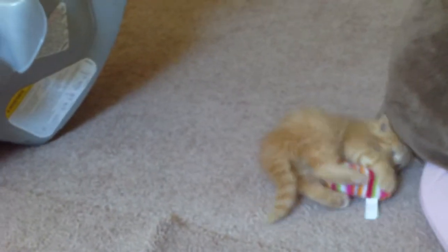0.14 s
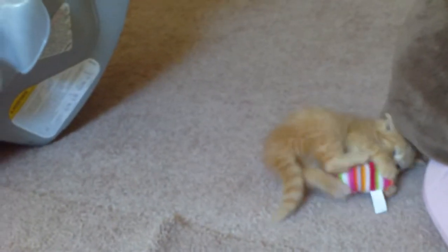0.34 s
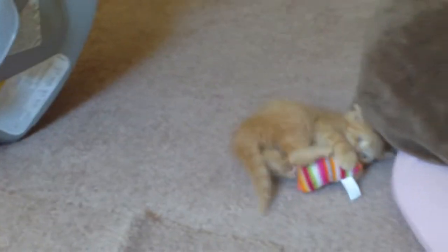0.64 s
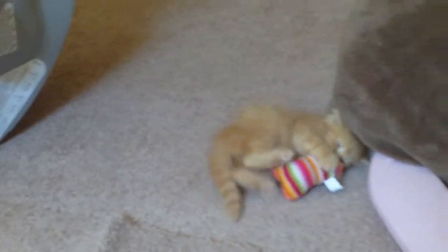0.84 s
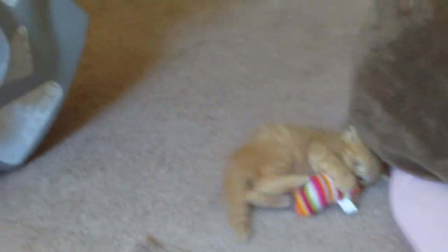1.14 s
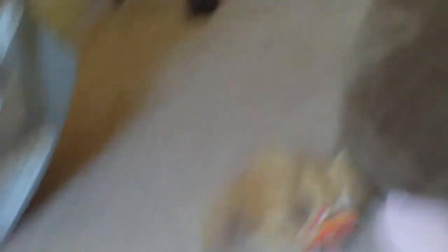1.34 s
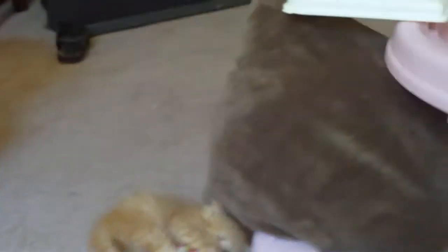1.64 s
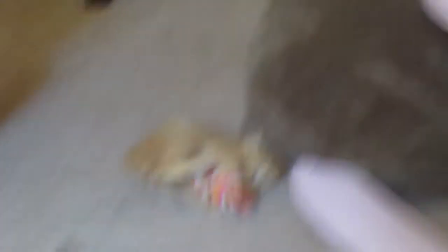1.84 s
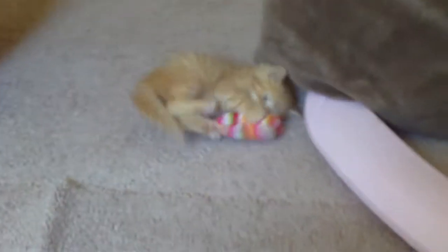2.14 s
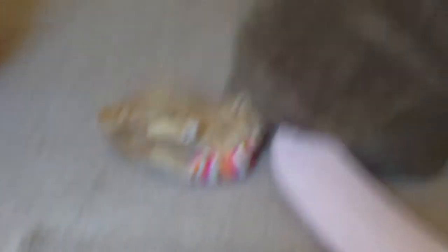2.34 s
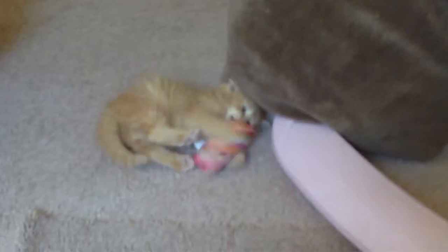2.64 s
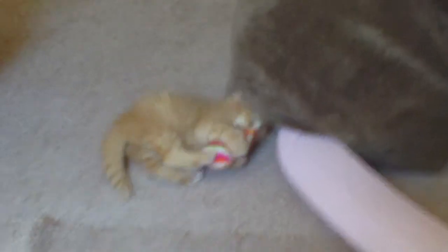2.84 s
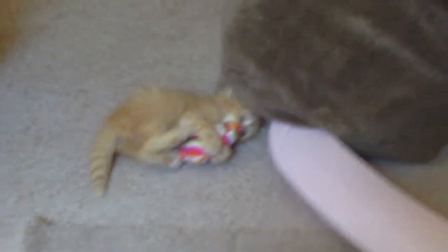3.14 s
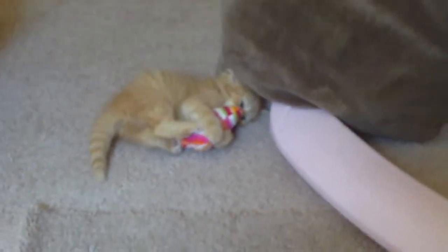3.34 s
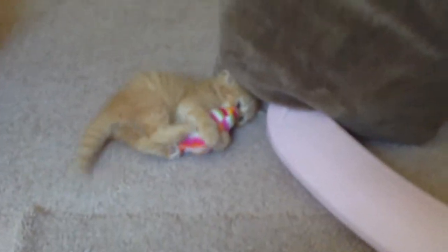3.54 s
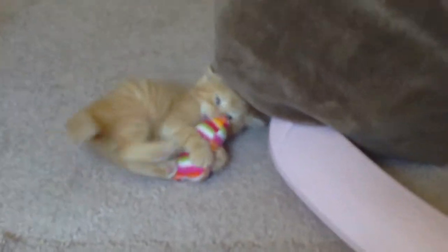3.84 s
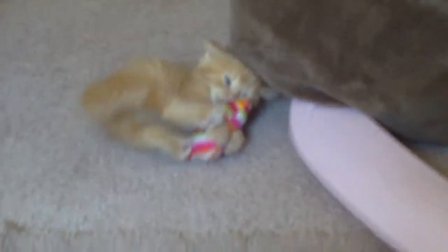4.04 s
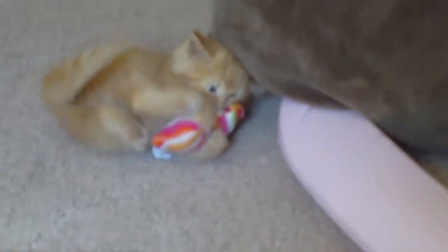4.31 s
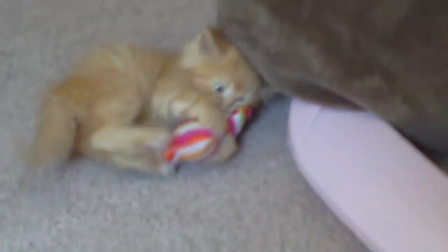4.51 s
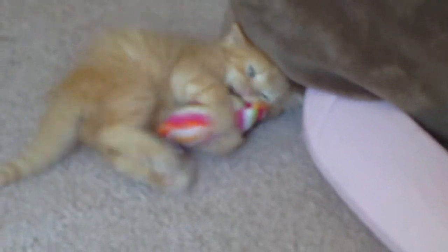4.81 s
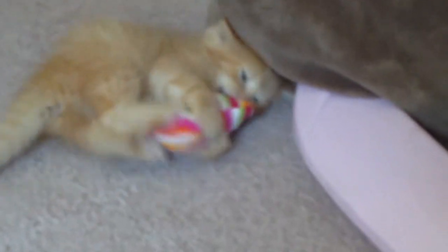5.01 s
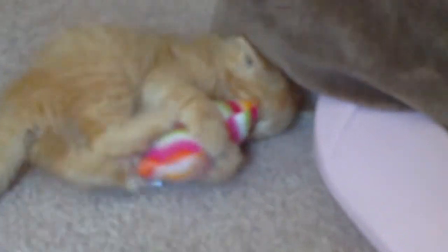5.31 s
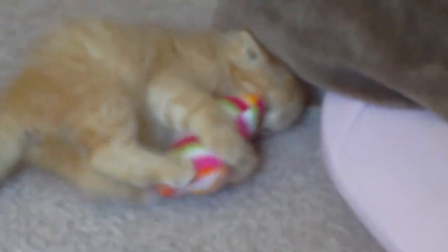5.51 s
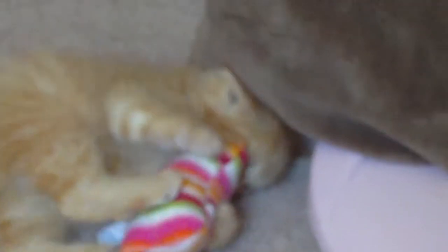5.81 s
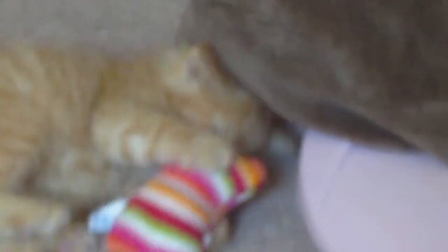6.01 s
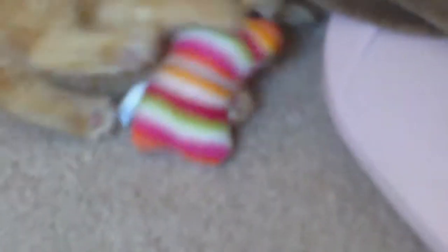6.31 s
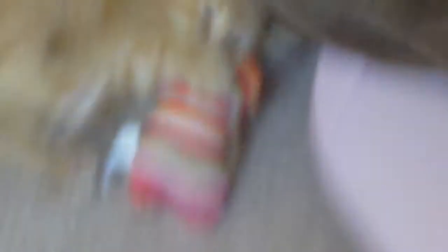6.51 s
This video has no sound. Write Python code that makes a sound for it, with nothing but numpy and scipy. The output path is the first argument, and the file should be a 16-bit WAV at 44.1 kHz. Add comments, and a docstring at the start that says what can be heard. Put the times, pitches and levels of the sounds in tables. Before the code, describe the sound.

A kitten wrestles a stuffed fabric toy on carpet, heard from close by in a quiet, dry room. Soft hiss and a faint, thin camera whine run throughout. Around 0.4 seconds a few small hard parts click lightly. From 1.2 seconds cloth rubs in short, swelling, scratchy strokes, with claws snagging in the weave and soft bumps. The loudest knock lands at 1.5 seconds, and a quick cluster of clacks and bumps follows at 1.8. One more rub swells at about 2.2 seconds, then fades to faint brushing with light ticks and is gone by 3.1. Scattered plastic-like clicks follow with gaps between them, the sharpest at 3.3 and 4.5 seconds and a double one near 5.7. After a last small tick at 5.8 seconds, only the hiss and whine remain until the end at about 6.7 seconds.

```python
"""A kitten wrestles a stuffed fabric toy on carpet, heard from close by over room air and camera whine.
First small hard parts click faintly. From 1.2 s cloth rubs in swelling stick-slip strokes, claws snag
in the weave, and the parts bump and ring on impact, hardest at 1.5 s. The rubbing dies away by 3.1 s.
Scattered clicks follow, the sharpest at 3.3, 4.5 and 5.7 s; gain control ducks after the hardest ones.
At the end only the hiss and the thin whine remain."""
import sys
import numpy as np
from scipy import signal
from scipy.fft import rfft, irfft
from scipy.io import wavfile
from scipy.ndimage import uniform_filter1d, map_coordinates

SR = 44100
rng = np.random.default_rng(int(sys.argv[2]) if len(sys.argv) > 2 else 0)


def generate_wav(signal):
    """Clip the signal to [-1, 1] and save it as 16-bit WAV at the path in sys.argv[1]."""
    frames = np.transpose(np.atleast_2d(signal))
    scaled = np.clip(frames, -1, 1) * 32767
    pcm = np.round(scaled).astype(np.int16)
    wavfile.write(sys.argv[1], SR, pcm)


N = 293882
TIME = np.arange(N) / SR
BAND_EDGE_HZ, HISS_EDGE_HZ = 16300, 15400
IMPACT_RISE_S = .0005


def amp(db):
    """Amplitude ratio: tenfold for every 20 dB."""
    return 10 ** (np.asarray(db) / 20)


def unit_rms(x):
    """Power normalisation to rms 1."""
    return x / np.sqrt(np.mean(x ** 2) + 1e-20)


def unit_energy(x):
    """Energy normalisation of a transient to that of 5 ms at rms 1."""
    return x / np.sqrt(np.sum(x ** 2) / (.005 * SR) + 1e-20)


def colour(x, spectrum, peaks=()):
    """Minimum-phase filtering: a broad spectrum with resonance peaks on top."""
    hz = np.fft.rfftfreq(4096, 1 / SR)
    points_hz, points_db = np.transpose(spectrum)
    db = np.interp(np.log(hz + 1), np.log(points_hz + 1), points_db)
    db += sum(rise / (1 + (2 * (hz - centre) / width) ** 2) for centre, width, rise in peaks)
    log_gain = np.log(amp(np.r_[db, db[-2:0:-1]]))
    taps = np.fft.ifft(np.exp(np.conj(signal.hilbert(log_gain)))).real
    return signal.fftconvolve(x, taps)[:len(x)]


def low_pass(x, hz):
    """Band limiting with a steep linear-phase filter."""
    return signal.oaconvolve(x, signal.firwin(255, hz, window=("kaiser", 9), fs=SR), "same")


def low_cut(x, hz):
    """High-pass filtering: little sound remains below hz."""
    return signal.sosfilt(signal.butter(N=2, Wn=hz, btype="high", fs=SR, output="sos"), x)


def wobble(per_s):
    """Random modulation of rms 1, linear between chance values."""
    knots = rng.standard_normal(N // 20)
    return unit_rms(np.interp(TIME * per_s, np.arange(len(knots)), knots))


def add(mix, start_s, sound):
    """Superposition: a sound joins the mix at start_s."""
    part = mix[round(start_s * SR):][:len(sound)]
    part += sound[:len(part)]


# spectrum of room air and microphone hiss: frequency_hz, relative_db
AIR_SPECTRUM = [(25, -64.5), (60, -37.5), (110, -20), (165, -22.5), (230, -15), (310, -7), (420, -4.5),
                (740, 1.5), (1300, 2), (1900, -4.5), (3200, -6.5), (4500, -10.5), (10900, -13),
                (15500, -17.5)]
# tones of a distant motor and the camera: start_s, end_s, pitch_hz, level_db
WHINE_TONES = [(0, 6.7, 229, -85), (0, 6.7, 457, -80), (0, 6.7, 7860, -81), (0, 3.55, 11090, -86),
               (3.55, 6.7, 11090, -78), (5.19, 5.39, 15046, -68)]
def background(noise_db=-55, waver_db=0.06, drift=.0005, fade_s=0.0092):
    """Noise floor: broadband air and hiss under faint tones with slight frequency modulation."""
    gain = amp(noise_db + waver_db * wobble(per_s=12))
    out = gain * unit_rms(colour(rng.standard_normal(N), AIR_SPECTRUM))
    for start, end, hz, db in WHINE_TONES:
        gate = np.clip(np.minimum(TIME - start, end - TIME) / fade_s, 0, 1)
        turns = np.cumsum(hz * (1 + drift * wobble(per_s=40))) / SR
        out += amp(db) * gate * np.sqrt(2) * np.sin(2 * np.pi * turns)
    return out


def room(x, tail_db=-25, t60_s=0.029):
    """Reverberation: absorption by the carpet leaves a weak, short, dull tail."""
    t = np.arange(SR // 3) / SR
    tail = colour(rng.standard_normal(len(t)), [(100, -10), (1200, 0), (3000, -7), (12000, -24)])
    tail *= amp(-60 * t / t60_s) * (t > .005)
    return x + amp(tail_db) * signal.fftconvolve(x, tail / np.linalg.norm(tail))[:N]


def fibres(per_s, spread_db, smooth_db):
    """Stick-slip friction: tiny impulses of uneven size over a smooth sliding noise."""
    size = amp(spread_db * np.minimum(rng.exponential(1, N), 4))
    slips = size * rng.choice([-1, 1], N) * (rng.random(N) < per_s / SR)
    return unit_rms(slips) + amp(smooth_db) * rng.standard_normal(N)


# resonances that rubbing excites, and one notch: centre_hz, width_hz, gain_db
RUB_RESONANCES = [(1130, 90, 2), (1566, 78, 8), (2120, 140, 9.5), (2640, 960, 5.5), (3195, 260, 12.5),
                  (3960, 300, 13), (4820, 250, 10.5), (5690, 650, 12), (6730, 440, 13), (7650, 117, -23),
                  (8840, 200, 12), (9860, 74, 13), (13000, 1400, 6)]
# firmness of contact: time_s, resonant_share
FIRMNESS = [(1.35, .45), (1.7, .95), (2.3, 1), (2.95, .8)]
def cloth(slips, spectrum):
    """Mechanical coupling: firmer contact sends more of the friction noise through the resonances."""
    share = np.interp(TIME, *np.transpose(FIRMNESS))
    plain = unit_rms(colour(slips, spectrum))
    resonant = unit_rms(colour(slips, spectrum, RUB_RESONANCES))
    return (1 - share) * plain + share * resonant


def wander(x, drift):
    """Frequency modulation: the pitch of a rubbing noise wanders as the contact moves."""
    position = np.arange(N) + drift * np.cumsum(wobble(per_s=9))
    return map_coordinates(x, [position], order=3, mode="mirror")


def stroke(start, length, swell_db, attack_s=0.015, release_s=0.011):
    """Amplitude envelope of a slide: it sets in, changes by swell_db to its final level, and lets go."""
    t = TIME - start
    attack = np.clip(1 + t / attack_s, 0, 1)
    swell = amp(swell_db * (np.clip(t / length, 0, 1) - 1))
    release = np.exp(-np.maximum(t - length, 0) / release_s)
    return attack * swell * release


RASP_SWELL = 0.57  # share of a stroke's swell that the rasp follows
# spectra of the sliding fibres and of the catching weave: frequency_hz, relative_db
HISS_SPECTRUM = [(200, -31.5), (1200, -13), (2500, -2.5), (4300, -7.5), (5500, -4), (8000, 2.5),
                 (11000, -2), (13000, -8.5), (15500, -11)]
RASP_SPECTRUM = [(40, -39), (160, -69), (300, -16), (500, -31), (720, 1), (1100, 5), (1800, 4.5),
                 (2600, -5.5), (4500, -10), (12000, -47)]
# faint brushing between the strokes: time_s, level_db
BRUSH_LEVELS = [(2.2, -70), (2.28, -56), (2.37, -54.5), (2.48, -62.5), (2.6, -66), (2.8, -65.5),
                (2.97, -64.5), (3.08, -68)]
# strokes of the cloth: start_s, length_s, final_hiss_db, final_rasp_db, swell_db
RUB_STROKES = [(0.397, .040, -61, -61, -4), (1.21, 0.11, -35.5, -37, 10), (1.329, .022, -30.5, -33, 1),
               (1.397, 0.047, -47.5, -47, 2.5), (1.528, 0.05, -49, -46.5, 7),
               (1.700, 0.23, -44, -43.5, 4.5), (1.942, 0.055, -41, -46.5, 3.5),
               (2.015, 0.074, -50, -58, -1), (2.091, 0.13, -32, -35, 18), (2.23, .022, -42, -53, -15.5),
               (2.317, 0.023, -53, -69, 1), (2.912, 0.073, -58, -59, -2.5)]
def rubbing(judder_db=0.87, rasp_drift=.025, brush_rasp_db=-1):
    """Sliding friction with a slight judder: fine fibres hiss and the coarser weave rasps."""
    hiss = cloth(fibres(per_s=2000, spread_db=4.0, smooth_db=-3.5), HISS_SPECTRUM)
    rasp = cloth(fibres(per_s=730, spread_db=-2, smooth_db=-4.0), RASP_SPECTRUM)
    rasp = wander(rasp, rasp_drift)
    hiss_gain = amp(np.interp(TIME, *np.transpose(BRUSH_LEVELS), left=-200, right=-200))
    rasp_gain = amp(brush_rasp_db) * hiss_gain
    for start, length, hiss_db, rasp_db, swell_db in RUB_STROKES:
        hiss_gain += amp(hiss_db) * stroke(start, length, swell_db)
        rasp_gain += amp(rasp_db) * stroke(start, length, RASP_SWELL * swell_db)
    return (hiss * hiss_gain + rasp * rasp_gain) * amp(judder_db * wobble(per_s=140))


def onset(t, rise_s=IMPACT_RISE_S):
    """Exponential build-up of a vibration."""
    return 1 - np.exp(-t / rise_s)


def burst(envelope, passes=3):
    """Spectral whitening: random slips under an envelope, their energy spread over all frequencies."""
    slips = envelope * rng.standard_normal(len(envelope))
    for _ in range(passes):
        phases = np.angle(rfft(slips))
        slips = irfft(np.exp(1j * phases), len(envelope)) * envelope ** .25
    return slips


# response of the whole struck body: frequency_hz, relative_db
BODY_SPECTRUM = [(200, -30), (600, -9), (1050, 0), (1600, -1), (2600, -10), (6000, -36), (14000, -65)]
def knock(t, hz, cycles, body_db=-11, body_decay_s=0.0052):
    """Damped oscillation: a short ring, damped ever harder, with a brief murmur of the whole body."""
    damping = np.exp(-(t * hz / cycles / 2) ** 1.5)  # 1/e after twice `cycles` periods
    tone = low_cut(np.sin(2 * np.pi * hz * t) * onset(t) * damping, hz / 2)
    murmur = burst(onset(t, rise_s=0.00059) * np.exp(-t / body_decay_s), passes=1)
    return unit_energy(tone) + amp(body_db) * unit_energy(colour(murmur, BODY_SPECTRUM))


# modes of the knocked plastic: pitch_hz, relative_db, t60_s
PLASTIC_MODES = [(1244, 9, 0.012), (1548, 5.5, 0.021), (1985, 5.5, 0.016), (2530, 3.5, 0.013),
                 (3314, 5.5, 0.0096)]
def clack(t):
    """Modal vibration: struck plastic rings as a sum of decaying sines."""
    ring = sum(amp(db - 60 * t / t60) * np.sin(2 * np.pi * hz * t) for hz, db, t60 in PLASTIC_MODES)
    return unit_energy(ring * onset(t))


def bump(hz, clack_db=-13):
    """Cushioned impact: a knock that barely excites the modes of the plastic."""
    t = np.arange(SR // 20) / SR
    return knock(t, hz, cycles=0.82) + amp(clack_db) * clack(t)


def snags(per_stroke=3, above_rasp_db=-2, spread_db=4, low_hz=810, high_hz=1700):
    """Catch and release: claws snag in the weave at random moments of each stroke, as faint bumps."""
    out = np.zeros(N)
    for start, length, _, final_rasp_db, swell_db in RUB_STROKES:
        for place, force, pitch in rng.random((per_stroke, 3)):
            rasp_db = final_rasp_db + RASP_SWELL * swell_db * (place - 1)
            db = rasp_db + above_rasp_db + spread_db * (2 * force - 1)
            add(out, start + place * length, amp(db) * bump(low_hz + pitch * (high_hz - low_hz)))
    return out


# cushioned impacts: start_s, level_db, pitch_hz
SOFT_IMPACTS = [(0.997, -52, 445), (1.0404, -45, 734), (1.2326, -35, 930), (1.4182, -37.5, 960),
                (1.8259, -26, 865), (1.8455, -19.5, 1230), (1.8767, -34, 1780), (1.8883, -38, 850),
                (1.897, -39, 880), (2.298, -33.5, 880), (2.4082, -38, 890), (3.232, -37, 730),
                (3.2504, -36, 1580)]
def bumps():
    """Soft contact excites little treble, so these impacts sound without a snap."""
    out = np.zeros(N)
    for start, db, hz in SOFT_IMPACTS:
        add(out, start, amp(db) * bump(hz))
    return out


# spectra of a hard snap and of its after-ring: frequency_hz, relative_db
SNAP_SPECTRUM = [(100, -24), (600, -17), (2000, -10), (2700, -8), (3300, 3.5), (4100, -6), (5200, -1),
                 (6800, 0), (7600, -3), (9000, 1), (12000, -7), (16000, -19)]
RING_SPECTRUM = [(400, -30), (1100, 2), (1500, 0), (2300, -10), (3000, -5), (4200, -22), (5500, -8),
                 (6300, -2), (6950, 3), (7700, -18), (10000, -16), (14000, -35)]
def snap(t, hz, decay_s, peak_db=5, rattle_db=-15, rattle_t60_s=0.01, ring_db=-26, ring_t60_s=0.11):
    """Impulsive excitation: a burst of slips with a resonance at hz, a quick rattle and a faint ring."""
    slips = burst(onset(t) * np.exp(-t / decay_s))
    slips = signal.lfilter(*signal.butter(N=2, Wn=min(1.6 * hz, BAND_EDGE_HZ), fs=SR), slips)
    crack = unit_energy(colour(slips, SNAP_SPECTRUM, [(hz, hz / 5, peak_db)]))
    after = colour(rng.standard_normal(len(t)), RING_SPECTRUM) * onset(t, rise_s=0.0026)
    rattle = unit_energy(after * amp(-60 * t / rattle_t60_s))
    ring = unit_energy(after * amp(-60 * t / ring_t60_s))
    return crack + amp(rattle_db) * rattle + amp(ring_db) * ring


# the hardest snaps are the shortest: snap_db, decay_s
SNAP_DECAYS = [(-17.5, 0.0016), (-9, 0.000522)]
# impacts of small hard parts: start_s, knock_db, knock_hz, knock_cycles, clack_db, snap_db, snap_hz
HARD_IMPACTS = [(0.3597, -31, 1600, 2.2, -34.5, -43.5, 3200), (0.410, -40.5, 1200, 4.8, -42.5, -45, 6800),
                (0.4343, -40, 1290, 2.1, -41, -45.5, 8500), (0.530, -44, 1230, 1.5, -42.5, -49, 5800),
                (1.3947, -43, 1020, 1, -44, -65, 3600), (1.471, -9.5, 631, 1.01, -15, -19, 8200),
                (1.6905, -39, 1600, 0.13, -53.5, -49, 3400), (1.8362, -18, 833, 1, -17.5, -24, 7560),
                (2.227, -33, 1480, 1, -32, -26, 9400), (2.3165, -48, 1570, 1.5, -41, -44, 3260),
                (2.403, -53, 1830, 1.4, -40, -44, 7050), (2.677, -57, 1630, 3, -40, -52, 4000),
                (2.6823, -31.5, 1635, 3.6, -33.5, -36, 9100), (2.9526, -38, 1150, 0.36, -39, -50, 5000),
                (3.199, -39.5, 975, 2, -57.5, -47, 4500), (3.2212, -36.5, 1604, 1.8, -34, -31.5, 6250),
                (3.3232, -26, 1200, 2.2, -24.5, -10.5, 8200), (3.5712, -41.5, 1605, 2.4, -40.5, -54, 3100),
                (3.7012, -55, 890, 1.2, -49.5, -55, 3200), (4.0881, -35.5, 1720, 2.4, -38, -65, 3000),
                (4.3314, -33, 740, 0.29, -32.5, -35, 9200), (4.5434, -36, 1190, 1, -18.5, -13, 6800),
                (5.6347, -31.5, 940, 0.24, -28, -33, 6500), (5.6574, -19.5, 1220, 0.51, -19.5, -26, 4470),
                (5.83, -36.5, 1570, 0.53, -39.5, -51, 3100)]
def clicks(rebound_s=0.0022, rebound_db=-11):
    """Elastic collision: a snap and a clack that rebound once, over a duller knock."""
    out, t = np.zeros(N), np.arange(SR // 5) / SR
    for start, knock_db, knock_hz, cycles, clack_db, snap_db, snap_hz in HARD_IMPACTS:
        decay_s = np.interp(snap_db, *np.transpose(SNAP_DECAYS))
        crack = amp(clack_db) * clack(t) + amp(snap_db) * snap(t, snap_hz, decay_s)
        add(out, start, crack + amp(knock_db) * knock(t, knock_hz, cycles))
        add(out, start + rebound_s, amp(rebound_db) * crack)
    return out


def scene():
    """Superposition of impacts and friction in the room, over the noise floor."""
    hits = room(low_cut(clicks() + bumps() + snags(), hz=255))
    rubs = room(low_cut(rubbing(), hz=130))
    return (hits + low_pass(rubs + background(), HISS_EDGE_HZ))[None]


def record(dry, threshold_db=-21, recovery_db_per_s=260, share=0.41, lag_s=0.0056, lopsided=0.02):
    """Automatic gain control: it reacts late, so the hardest clicks overload and what follows ducks."""
    x = dry[0]
    power_db = 10 * np.log10(abs(uniform_filter1d(x ** 2, size=260)) + 1e-12)
    fall_db = TIME * recovery_db_per_s
    held_db = np.maximum.accumulate(power_db + fall_db) - fall_db  # peak hold with a steady release
    over_db = uniform_filter1d(np.maximum(held_db - threshold_db, 0), size=180)
    duck_db = share * np.interp(TIME - lag_s, TIME, over_db)
    x = x * amp(-duck_db)
    ceiling = .7 * (1 - lopsided * np.sign(x))  # one side of the wave saturates a little sooner
    x = x / (1 + (x / ceiling) ** 8) ** (1 / 8)
    return low_pass(x, BAND_EDGE_HZ)[None]


dry = scene()
out = record(dry)
generate_wav(out)
```